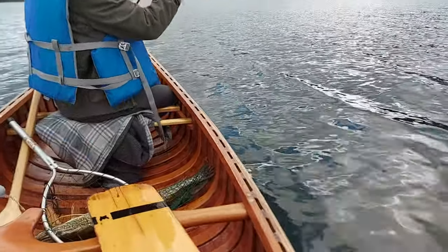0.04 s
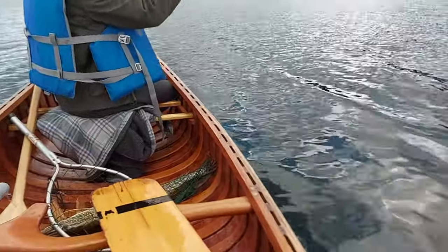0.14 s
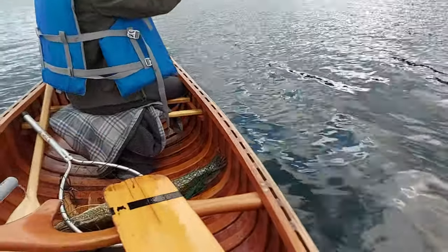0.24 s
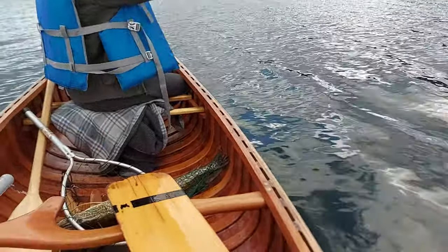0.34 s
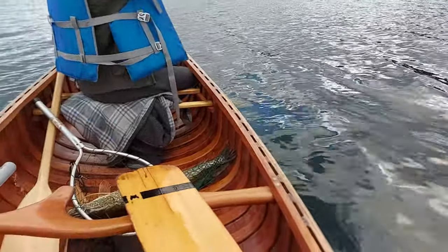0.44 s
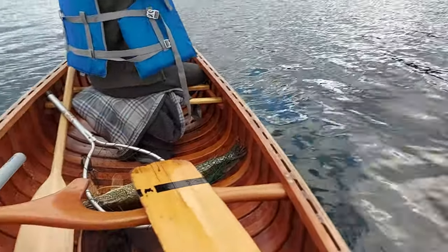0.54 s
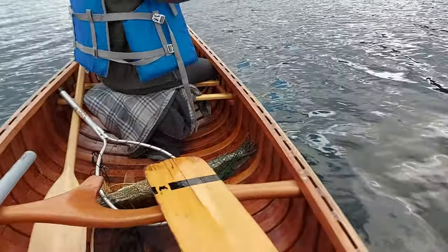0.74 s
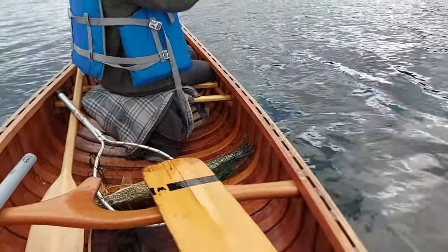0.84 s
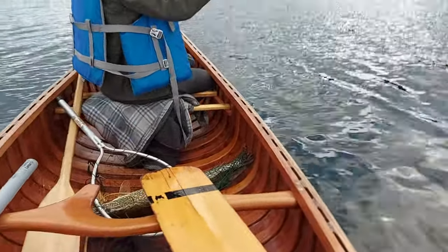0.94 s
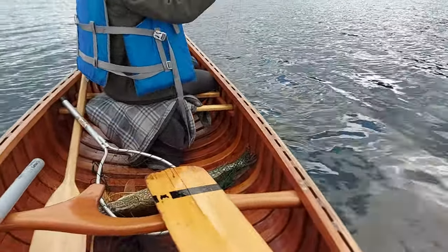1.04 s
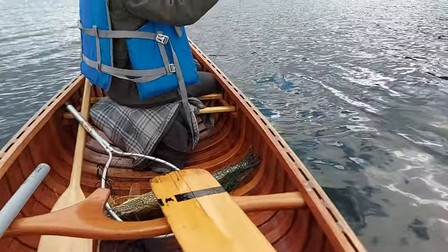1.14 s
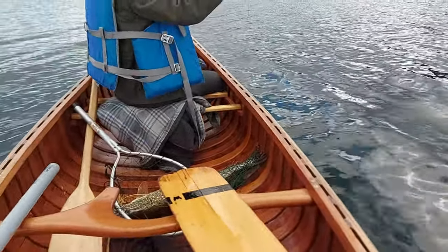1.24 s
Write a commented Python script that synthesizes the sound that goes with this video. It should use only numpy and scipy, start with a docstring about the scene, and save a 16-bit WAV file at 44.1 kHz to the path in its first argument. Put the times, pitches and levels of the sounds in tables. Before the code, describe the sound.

Wooden canoe hull knocks in two quick stuttering runs, then duller, heavier bumps over quiet water

```python
"""Calm water, aboard a drifting wooden canoe, heard in stereo from the stern seat. As the weight shifts, a
joint sticks and slips in two stuttering runs of knocks that ring the hull; then gear bumps the hull, ringing
it more softly, with a brief noise scuff and small ticks of filtered noise. Short low pulses give the deep
push of the heavier bumps and a few faint booms. Coloured noises of changing level make the faint boom of
the hull and a thin hiss of ripples."""
import sys
import numpy as np
from scipy import signal
from scipy.fft import rfft, irfft, next_fast_len
from scipy.io import wavfile
from scipy.ndimage import uniform_filter1d, map_coordinates

SR = 44100
rng = np.random.default_rng(int(sys.argv[2]) if len(sys.argv) > 2 else 0)


def dump(signal):
    """Clip the signal to [-1, 1] and save it as 16-bit WAV at the path in sys.argv[1]."""
    limited = np.clip(np.atleast_2d(signal).T, -1, 1)
    pcm = np.round(limited * 32767).astype(np.int16)
    wavfile.write(sys.argv[1], SR, pcm)


N = 57330
T = np.arange(SR * 6 // 10) / SR  # time within one short sound [s]


def amp(db):
    """Decibels to gain."""
    return 10 ** (np.asarray(db) / 20)


def unit(x):
    """Scale to rms 1."""
    return x / np.sqrt(np.mean(x ** 2) + 1e-20)


def along(points, hz):
    """Interpolate (frequency [Hz], value) points on a log frequency axis."""
    f, v = np.transpose(points)
    return np.interp(np.log(hz + 1), np.log(f + 1), v)


def fade(t60):
    """Exponential decay that falls 60 dB in t60 seconds."""
    return np.exp(-np.log(1000) * T / t60)


def sine(hz):
    """A steady sine over one short sound."""
    return np.sin(2 * np.pi * hz * T)


def swell(rise_s):
    """Exponential onset with time constant rise_s."""
    return 1 - np.exp(-T / rise_s)


def pan(db):
    """Left and right gains, the left db decibels above the right."""
    return amp(np.array([[db], [-db]]) / 2)


def filtered(x, response):
    """Filter x by a response given as a function of frequency."""
    n = x.shape[-1]
    m = next_fast_len(n + 8192)  # zero padding gives the tails room
    return irfft(rfft(x, m) * response(np.fft.rfftfreq(m, 1 / SR)), m)[..., :n]


def noise(spectrum, side_db, size):
    """Coloured stereo noise of rms 1; more side signal sounds wider."""
    white = rng.standard_normal((2, size))
    mid, side = filtered(white, lambda hz: amp(along(spectrum, hz)))
    side = amp(side_db) * side
    return unit(np.array([mid + side, mid - side]))


def add(out, s, sound):
    """Mix a sound in at time s."""
    part = out[:, max(0, round(s * SR)):][:, :sound.shape[1]]
    part += sound[:, :part.shape[1]]


# colour of the hiss: (frequency [Hz], relative density [dB per Hz])
HISS_COLOUR = [(1000, -6), (2800, -5.5), (4200, 6.5), (5600, -0.5), (7500, 6), (9500, -3.5), (12500, 8.5),
               (16000, 0)]
SPECK_RATE = 90  # clicks per second, on average


def specks():
    """Sparse tiny clicks, at random moments common to both ears, with the colour of the hiss; rms 1."""
    clicks = (rng.random(N) < SPECK_RATE / SR) * rng.standard_normal((2, N))
    return unit(filtered(clicks, lambda hz: amp(along(HISS_COLOUR, hz))))


# the water around the hull: (time [s], boom level [dB], ripple level [dB], hiss level [dB])
WATER_LEVELS = [(0, -81, -74.5, -72), (0.042, -69, -65.5, -64.5), (.136, -59, -75, -60.5),
                (0.179, -48, -74, -74), (0.268, -37, -86, -63), (.40, -55, -53.5, -60),
                (.52, -43.5, -60.5, -62), (0.618, -56, -58.5, -67.5), (0.738, -51, -52, -61),
                (.88, -38, -50, -68.5), (.96, -52.5, -55, -63.5), (1.05, -58, -60, -72.5),
                (1.141, -58.5, -67.5, -75.5), (1.25, -80.5, -73.5, -81), (1.3, -61.5, -72.5, -80.5)]
# colour of the floating hull's boom: (frequency [Hz], relative density [dB per Hz])
BOOM_COLOUR = [(20, -51.5), (40, -13.5), (62, -8), (78, -5.5), (105, -11), (200, -22), (500, -70)]
# colour of the ripples: (frequency [Hz], relative density [dB per Hz])
RIPPLE_COLOUR = [(40, -19), (130, 5), (320, 0), (600, -12.5), (1000, -13), (1800, -14.5), (2800, -25),
                 (6000, -34)]
SPECK_DB = -6  # specks against the hiss


def water():
    """Noise for the low boom of the floating hull, the ripples and a faintly crackling hiss."""
    s, *levels = np.transpose(WATER_LEVELS)
    boom_db, ripple_db, hiss_db = [np.interp(np.arange(N) / SR, s, level) for level in levels]
    boom = amp(boom_db) * noise(BOOM_COLOUR, -11, size=N)
    ripple = amp(ripple_db) * noise(RIPPLE_COLOUR, -3, size=N)
    crackle = unit(uniform_filter1d(rng.standard_normal(N), size=130))  # smoothed over about 3 ms
    hiss = noise(HISS_COLOUR, -1, size=N) + amp(SPECK_DB) * specks()
    return boom + ripple + amp(hiss_db + 0.5 * crackle) * hiss


GRAIN_DB, GRAIN_S = 2.5, .001  # rms depth at the grain points, and their spacing


def grainy(x):
    """Break a noise into crackling grains by a random level, keeping rms 1."""
    grain = map_coordinates(rng.standard_normal(len(T)), [T / GRAIN_S], order=1)
    return unit(x * amp(GRAIN_DB * grain))


# ticks of gear and droplets:
# (time [s], level [dB], centre frequency [Hz], t60 [s], left over right [dB])
TICKS_HEARD = [(0.022, -62, 13100, 0.011, 15), (0.0407, -41.5, 6840, 0.038, 0),
               (0.0404, -42.5, 4540, 0.028, -0.5), (0.079, -58, 7260, 0.051, 0),
               (0.1025, -53.5, 6300, 0.039, 7), (0.112, -55, 5990, 0.019, -5),
               (0.1313, -48.5, 7560, 0.031, -7), (0.1965, -36.5, 4444, 0.04, -2),
               (0.226, -53, 12000, 0.12, 5), (.2648, -51.5, 11880, 0.033, 3),
               (0.3572, -56.5, 7670, 0.04, -11.5), (0.3814, -44, 3760, 0.047, -6),
               (0.5346, -54.5, 10140, 0.017, 7.5), (0.7048, -45, 2970, 0.051, 1.5),
               (0.7102, -49.5, 7500, 0.014, -5), (0.7842, -40.5, 7050, 0.085, -7),
               (0.7824, -42.5, 13100, 0.087, -5.5), (0.803, -48, 11530, 0.096, -3.5),
               (0.866, -56.5, 6700, 0.06, -2), (0.8647, -45, 12700, 0.025, -5),
               (0.9697, -56, 12470, 0.028, -4), (0.987, -55.5, 5560, .03, -4),
               (1.08, -68, 10100, 0.0083, 10), (1.099, -63, 7180, 0.044, -2),
               (1.117, -71, 12130, 0.014, 7.5), (1.28, -64, 10940, 0.016, -5)]
TICK_WIDTH, TICK_RISE_S = 0.34, 0.00019  # width of each resonance over its centre; onset time constant


def ticks():
    """Each small tick is a grainy noise burst passed twice through one resonance."""
    out = np.zeros((2, N))
    for s, db, hz, t60, lr in TICKS_HEARD:
        shape = fade(t60) * swell(TICK_RISE_S)

        def band(f):
            width = 1j * f * TICK_WIDTH * hz
            return (width / (hz * hz - f * f + width)) ** 2

        white = noise([(1000, 0.0079), (16000, 0)], -0.87, size=len(T))  # practically flat
        burst = grainy(filtered(white, band))
        add(out, s, amp(db) * pan(lr) * burst * shape / shape.max())
    return out


# short low pulses, the deep push of the heavier bumps and a few faint booms:
# (middle [s], level [dB], frequency [Hz], half length to 1/e [s])
LOW_PULSES = [(0.064, -41, 58.8, .035), (0.6662, -27.5, 116, 0.0092), (.752, -32, 176.4, 0.017),
              (0.83, -17, 153, 0.0046), (0.88, -47.5, 65.3, 0.0099), (0.954, -33.5, 69.2, 0.0043),
              (1.031, -36, 152.2, 0.011)]


def low_pulses():
    """Each deep push or faint boom is a cosine under a Gaussian, equal in both ears."""
    out = np.zeros((2, N))
    for s, db, hz, half in LOW_PULSES:
        t = np.arange(N) / SR - s
        out -= amp(db) * np.exp(-(t / half) ** 2) * np.cos(2 * np.pi * hz * t)
    return out


# the hull's modes: (frequency [Hz], mean level [dB], t60 [s], left over right [dB])
HULL_MODES = [(81.5, -29, 0.36, -5), (127.6, -10, 0.32, -0.5), (158.4, -11, .25, 0),
              (241.1, -3.5, .13, 1.5), (283.4, -7.5, 0.29, 1), (356.2, -7, 0.16, 0.5),
              (455.3, -6.5, 0.099, 5.5), (571, -0.5, .08, 1.5), (619.4, -14, 0.086, -0.5),
              (686, -12, 0.029, 1.5), (868.7, -9, .07, 0), (915, -7, 0.029, 11.5), (989, -4, 0.043, 0),
              (1268, -11, 0.043, -15), (1517, -11, .055, -14), (1673, -12.5, 0.037, -18.5),
              (1776, -7.5, 0.027, -18.5), (2205, -17, 0.043, -16.5)]
# colour of the dense ring of planks and ribs: (frequency [Hz], relative density [dB per Hz])
PLANK_COLOUR = [(60, -28), (200, -2.5), (600, -8.5), (1000, -7), (1900, -5), (2400, -15.5), (3000, -20),
                (4400, -25.5), (6000, -31), (15000, -19.5)]
# how long planks and ribs ring: (frequency [Hz], t60 [s])
PLANK_DECAY = [(100, 0.21), (500, 0.086), (1500, 0.029), (5000, 0.091), (15000, .04)]
# the struck spot's short clack: (frequency [Hz], relative level [dB], t60 [s])
CRACK_MODES = [(727, 2, 0.014), (1380, 2.5, 0.0058), (1720, 5, 0.0067), (2296, -1.5, .012),
               (4160, -11.5, 0.011)]
AFTER_DB, AFTER_T60 = -37.5, 0.58  # slow tail of the planks: level against their onset, t60 [s]
CRACK_DB = -2
PANEL_T60, PANEL_RISE_S = 0.047, 0.0015  # the panel's decay; its onset time constant


def blow(bright_hz, low_hz, panel_hz, panel_db):
    """One contact cracks, rings the hull and planks, and the panel under it; a soft contact is duller."""
    modes = 0
    for k, (hz, db, t60, lr) in enumerate(HULL_MODES):
        level = amp(db + rng.normal())  # random spread of 1 dB rms on each mode's level
        modes = modes + (-1) ** k * level * pan(lr) * fade(t60) * sine(hz)

    hz, t, z = signal.stft(noise(PLANK_COLOUR, -6.5, size=len(T)), SR, nperseg=128)
    dying = np.exp(-np.log(1000) * t / along(PLANK_DECAY, hz)[:, None])
    dying = dying + amp(AFTER_DB) * np.exp(-np.log(1000) * t / AFTER_T60)
    planks = signal.istft(z * dying, SR, nperseg=128)[1][:, :len(T)]

    crack = 0
    for k, (hz, db, t60) in enumerate(CRACK_MODES):
        crack = crack + (-1) ** k * amp(db) * fade(t60) * sine(hz)

    ring = modes + pan(-3) * (planks + amp(CRACK_DB) * crack)
    for edge, kind in ((min(bright_hz, SR / 2 - 1), 'low'), (low_hz, 'high')):
        ring = signal.sosfilt(signal.butter(2, edge, kind, fs=SR, output='sos'), ring)
    panel = fade(PANEL_T60) * swell(PANEL_RISE_S) * sine(panel_hz)
    return ring - amp(panel_db) * pan(1.1) * panel


# slips of a loaded wooden joint:
# (time [s], gain of the blow [dB], brightness limit [Hz], panel ring within the blow [dB])
JOINT_SLIPS = [(.1972, -25.5, 1600, 9), (0.2024, -24.5, 4200, -35), (.2166, -22.5, 3800, -4),
               (0.2317, -30, 2600, -8), (.2438, -28, 5000, -18), (0.258, -34, 3000, -18),
               (0.2713, -34, 2780, -12), (0.4033, -29, 1470, 9), (0.4084, -24.5, 3800, -1.5),
               (0.4206, -29, 460, 2.5), (0.431, -35.5, 1800, -18), (.4370, -37, 2500, -4),
               (0.4489, -31, 3800, 1), (0.4618, -36, 2720, -24)]
JOINT_PANEL_HZ = 625.4
FAR_SIDE_S, FAR_SIDE_DB, FAR_SIDE_LOW_HZ = .00397, -17, 700  # delay, level and low edge of the return


def woodwork():
    """A joint sticks and slips; the far side of the hull returns the upper part of each knock."""
    out = np.zeros((2, N))
    for s, db, bright_hz, panel_db in JOINT_SLIPS:
        add(out, s, amp(db) * blow(bright_hz, 70, JOINT_PANEL_HZ, panel_db))

    def with_far_side(f):
        upper_part = f ** 2 / (f ** 2 + FAR_SIDE_LOW_HZ ** 2)
        return 1 + amp(FAR_SIDE_DB) * upper_part * np.exp(-2j * np.pi * f * FAR_SIDE_S)

    return filtered(out, with_far_side)


# gear bumping the hull: (time [s], gain of the blow [dB], brightness limit [Hz], low edge [Hz],
# t60 of the extra damping by the load [s], panel frequency [Hz], panel ring within the blow [dB])
GEAR_BUMPS = [(0.6545, -36.5, 650, 90, 0.2, 326, 8), (.6620, -25, 213, 90, 1, 251, 6.5),
              (0.7065, -24.5, 1300, 333, 0.36, 543, 9.5), (.7180, -30.5, 303, 110, 0.17, 438, 14),
              (0.726, -27, 360, 130, 0.23, 388, 8.5), (.8190, -19, 433, 80, 0.17, 445, -16),
              (0.8268, -19.5, 440, 121, 0.18, 562, -2), (.8400, -31, 290, 107, 0.44, 446, 8.5),
              (.8530, -25, 170, 60.3, 0.7, 170, 4), (.9220, -35, 170, 80, .6, 288, -7),
              (1.0160, -38, 170, 131, 0.9, 241.4, 0.5), (1.134, -58, 600, 252, 0.72, 408, -4),
              (1.197, -62, 1500, 353, 0.13, 518, -1.5)]


def bumps():
    """Softer, heavier blows on the hull, whose ring the load damps."""
    out = np.zeros((2, N))
    for s, db, bright_hz, low_hz, t60, panel_hz, panel_db in GEAR_BUMPS:
        add(out, s, amp(db) * blow(bright_hz, low_hz, panel_hz, panel_db) * fade(t60))
    return out


# strokes of the scuff just before the heaviest bump: (time [s], level [dB])
SCUFF_STROKES = [(0.7916, -36.5), (0.8022, -39), (.8130, -46.5)]
# colour of the scuff: (frequency [Hz], relative density [dB per Hz])
SCUFF_COLOUR = [(200, -9.5), (700, 4.5), (2000, 3.5), (4500, -3.5), (8000, -12), (15000, -29)]
SCUFF_RISE_S, SCUFF_T60 = 0.0009, 0.073  # onset time constant; decay [s]


def scuff():
    """A few strokes of grainy noise that start fast and die away."""
    out = np.zeros((2, N))
    for s, db in SCUFF_STROKES:
        rub = grainy(noise(SCUFF_COLOUR, 0, size=len(T)))
        add(out, s, amp(db) * rub * fade(SCUFF_T60) * swell(SCUFF_RISE_S))
    return out


RIGHT_LAG_S = .00016


def scene():
    """The hull's sound reaches the right port of the microphone a little later than the left."""
    background, small_ticks = water(), ticks()
    hull = low_pulses() + woodwork() + bumps()
    ports = np.array([[1], [-1]])  # left early, right late, by half the lag each
    hull = filtered(hull, lambda f: np.exp(1j * np.pi * f * RIGHT_LAG_S * ports))
    return background + small_ticks + hull + scuff()


LOW_CUT_HZ, TOP_HZ = 66, 16300


def record(dry):
    """The microphone drops the deepest bass and keeps nothing above its band limit."""
    def microphone(hz):
        low_cut = hz ** 2 / np.hypot(hz ** 2, LOW_CUT_HZ ** 2)
        return (hz < TOP_HZ) * low_cut

    return filtered(dry, microphone)


dry = scene()
out = record(dry)
dump(out)
```